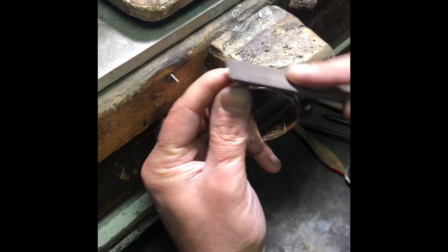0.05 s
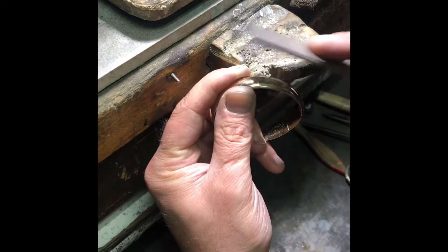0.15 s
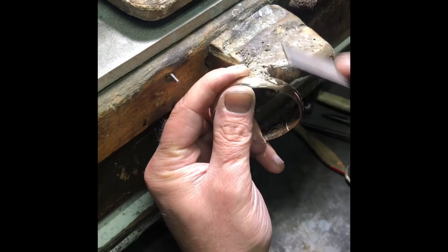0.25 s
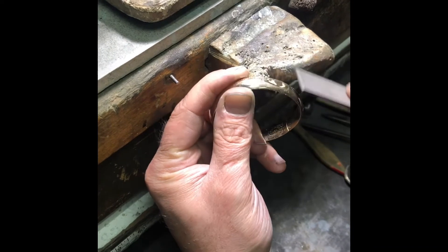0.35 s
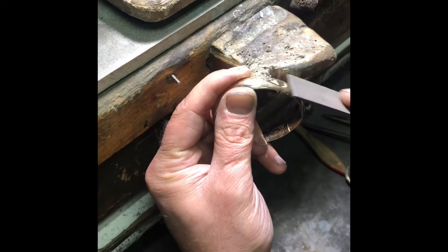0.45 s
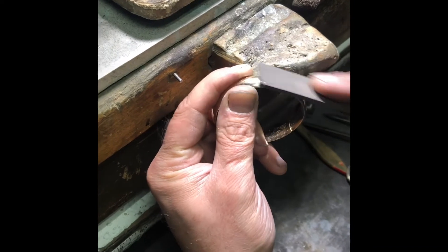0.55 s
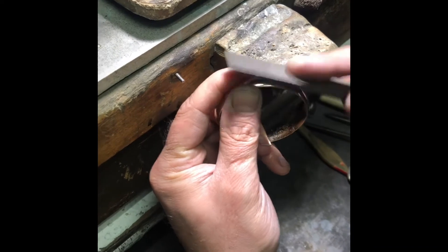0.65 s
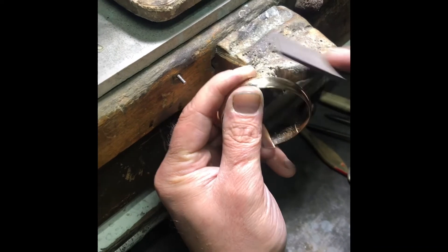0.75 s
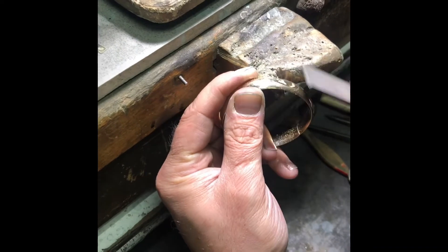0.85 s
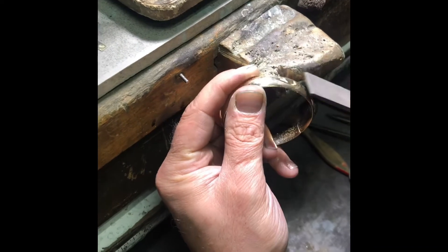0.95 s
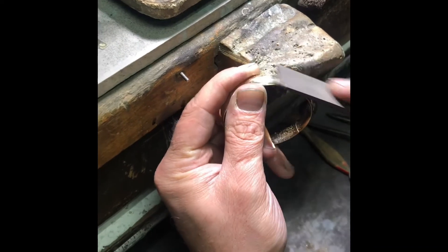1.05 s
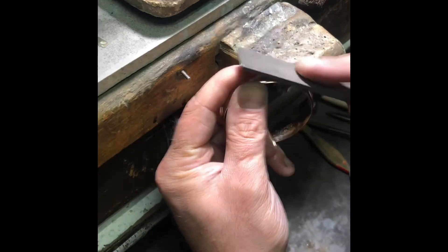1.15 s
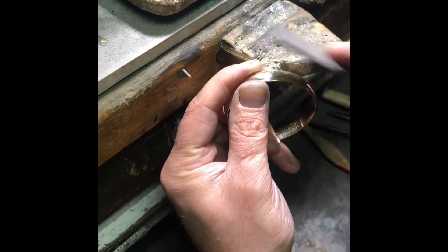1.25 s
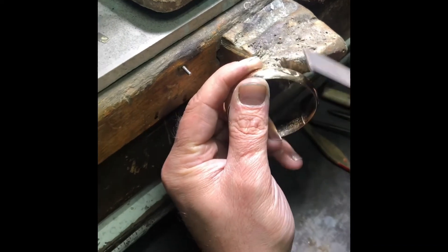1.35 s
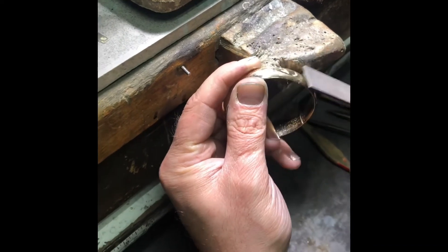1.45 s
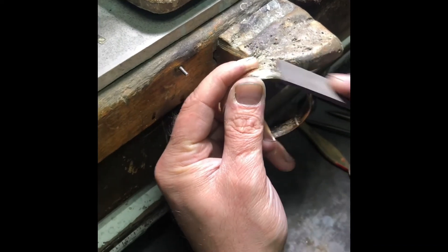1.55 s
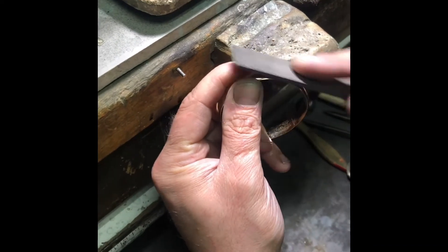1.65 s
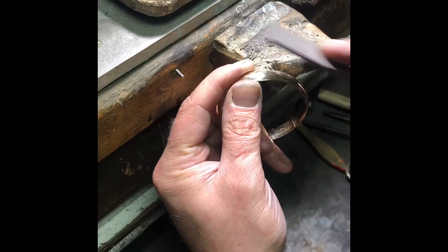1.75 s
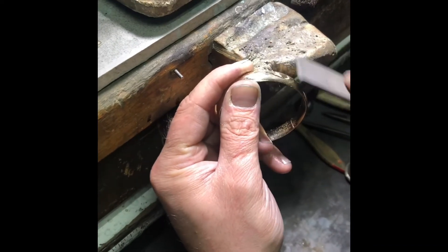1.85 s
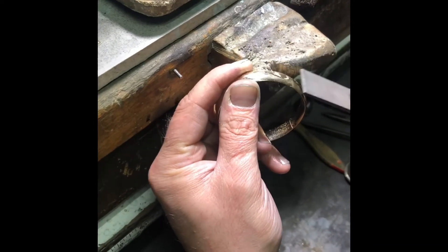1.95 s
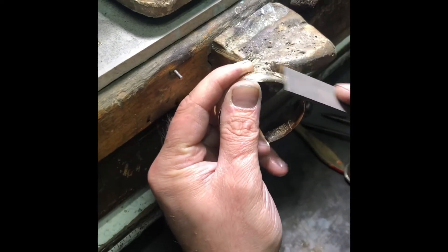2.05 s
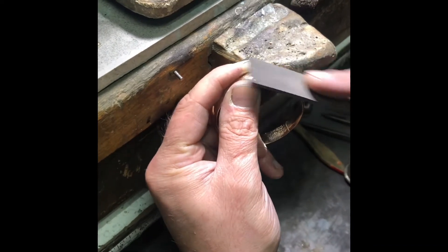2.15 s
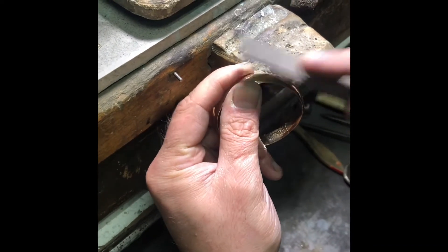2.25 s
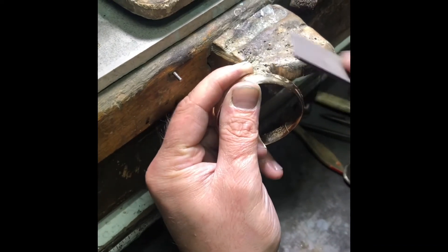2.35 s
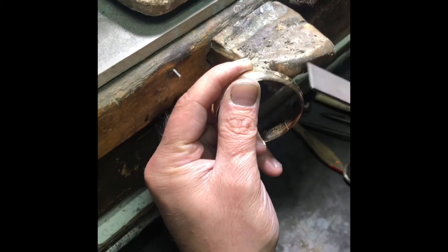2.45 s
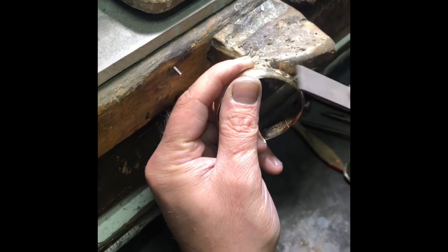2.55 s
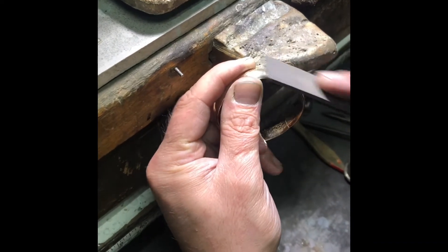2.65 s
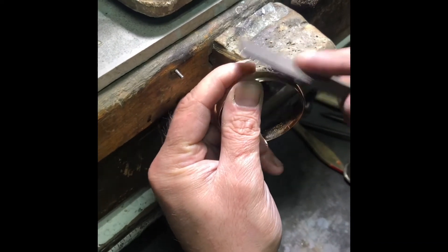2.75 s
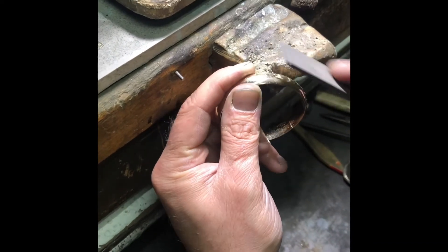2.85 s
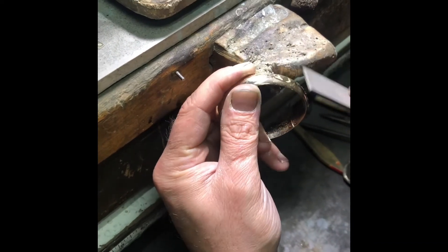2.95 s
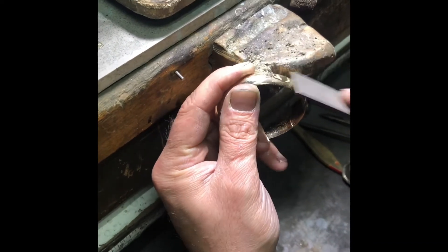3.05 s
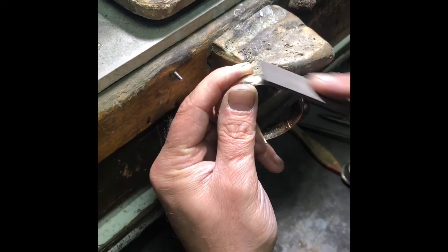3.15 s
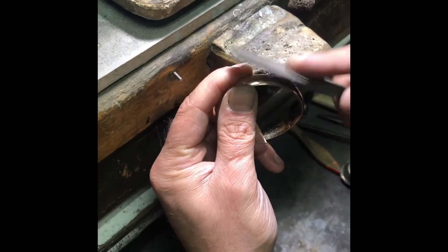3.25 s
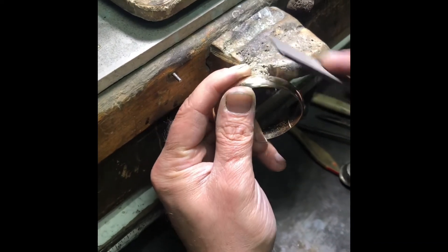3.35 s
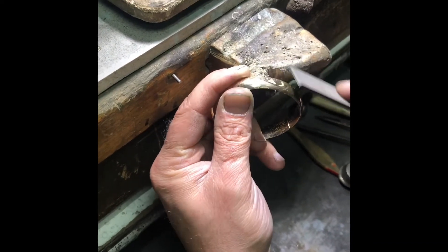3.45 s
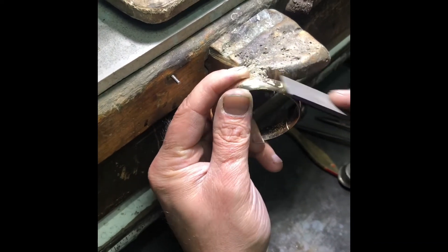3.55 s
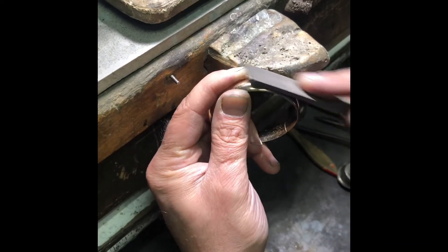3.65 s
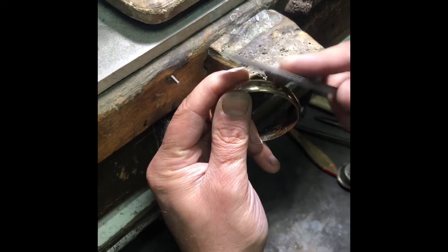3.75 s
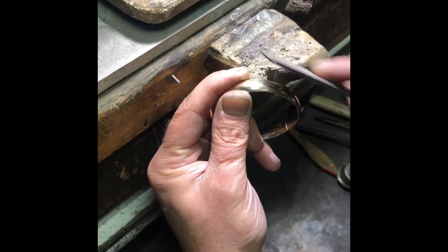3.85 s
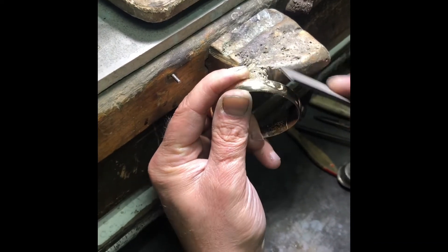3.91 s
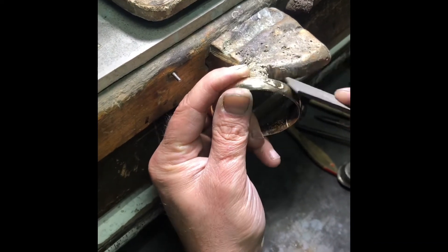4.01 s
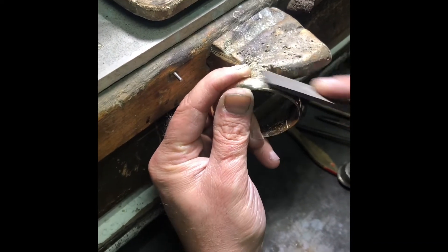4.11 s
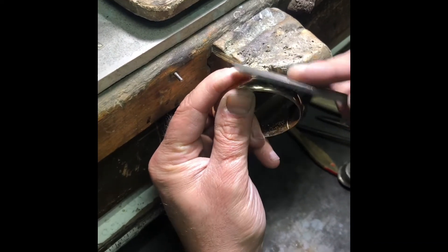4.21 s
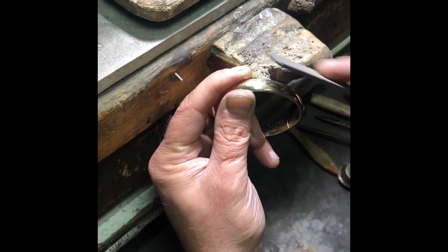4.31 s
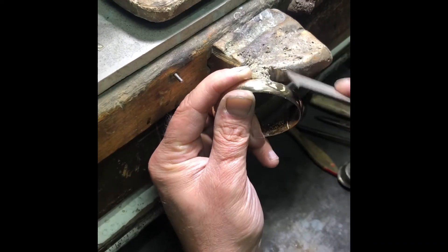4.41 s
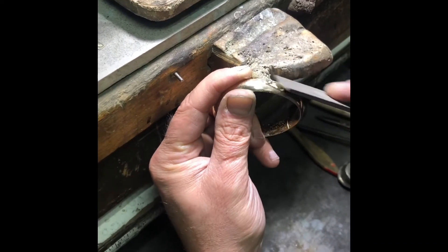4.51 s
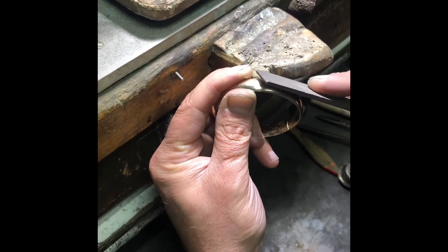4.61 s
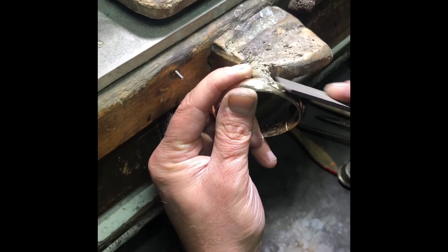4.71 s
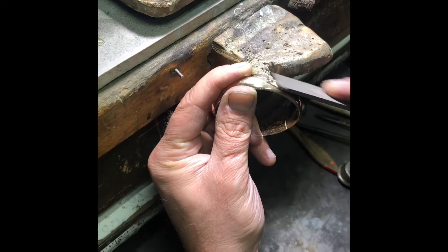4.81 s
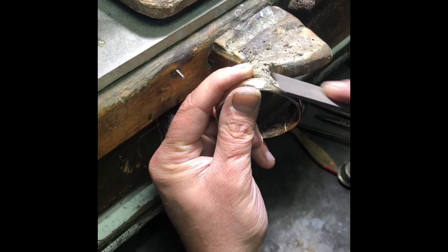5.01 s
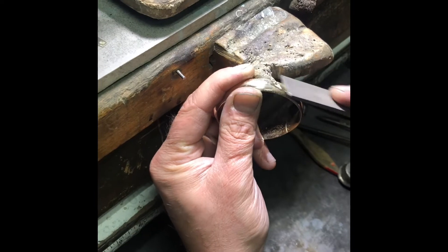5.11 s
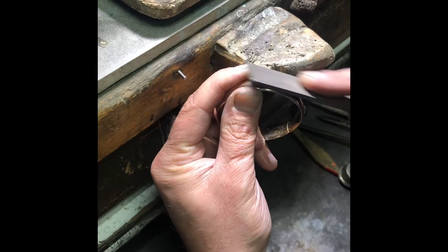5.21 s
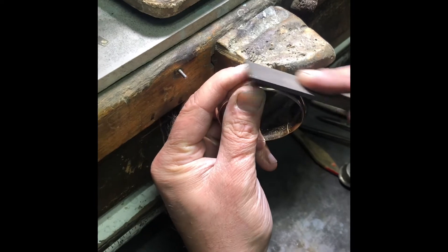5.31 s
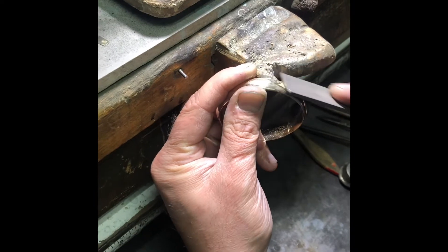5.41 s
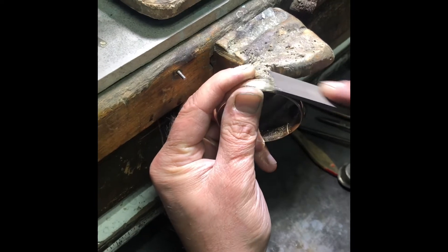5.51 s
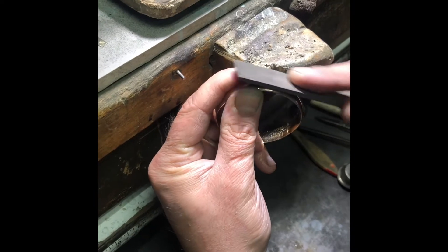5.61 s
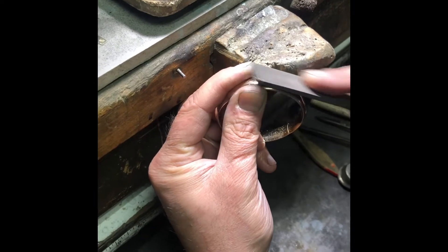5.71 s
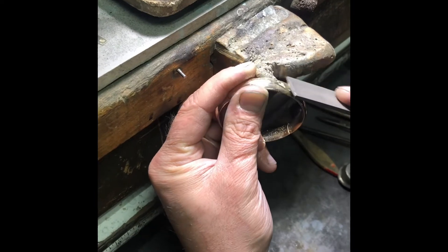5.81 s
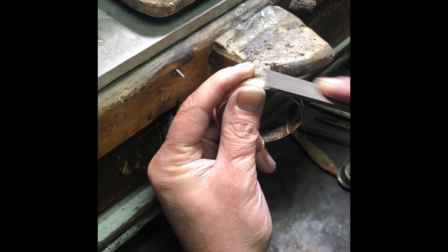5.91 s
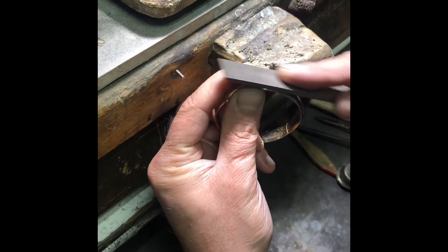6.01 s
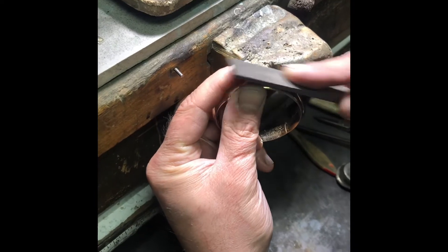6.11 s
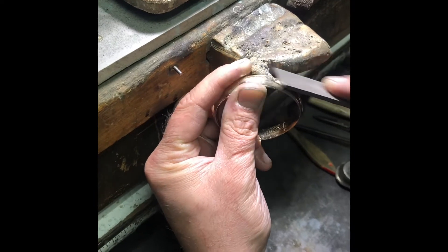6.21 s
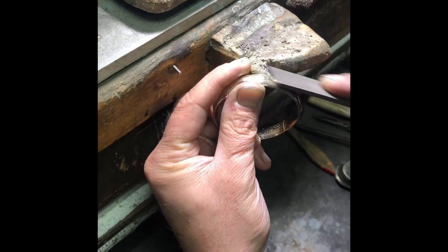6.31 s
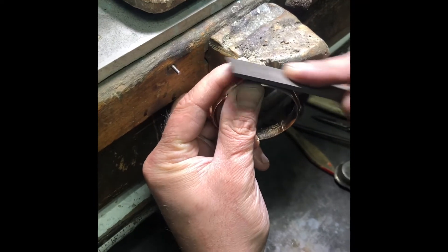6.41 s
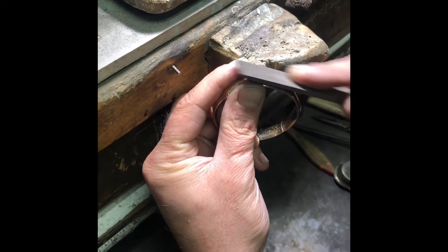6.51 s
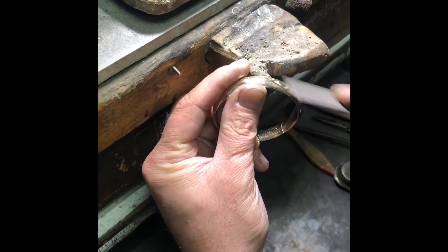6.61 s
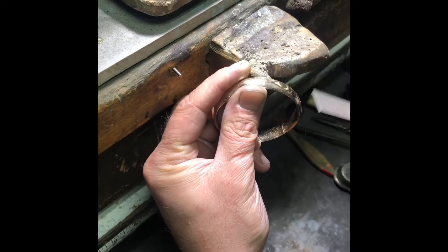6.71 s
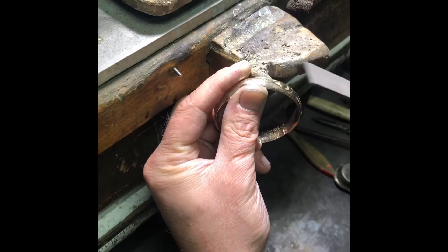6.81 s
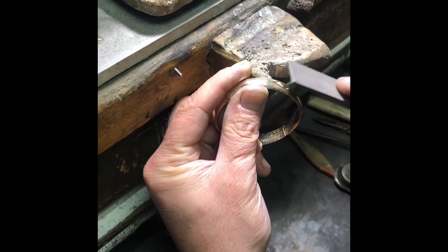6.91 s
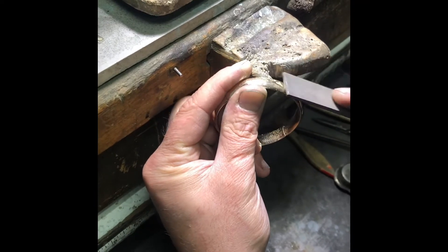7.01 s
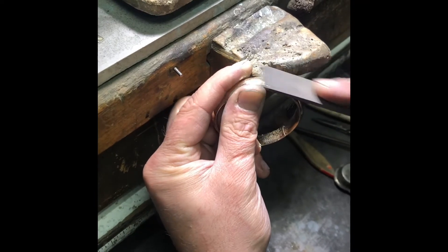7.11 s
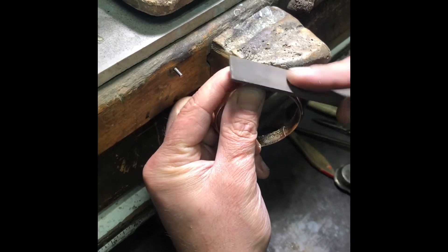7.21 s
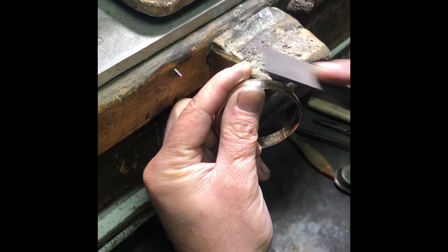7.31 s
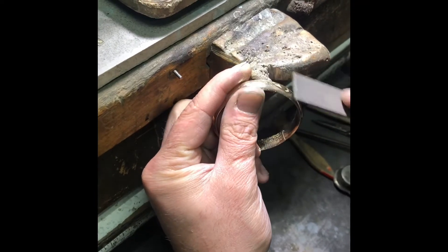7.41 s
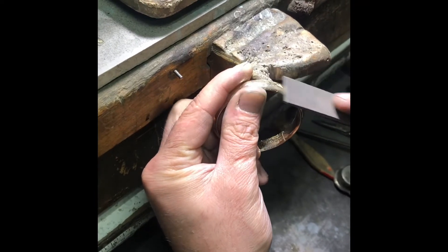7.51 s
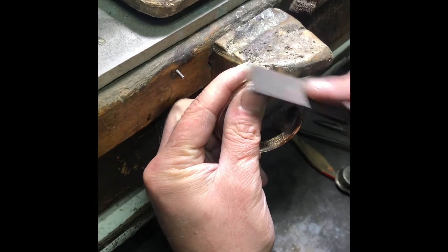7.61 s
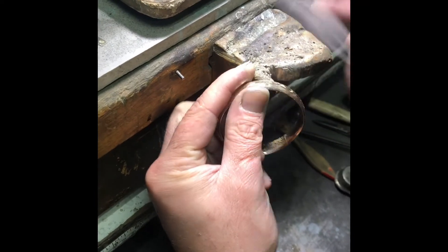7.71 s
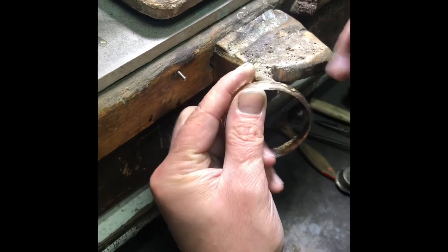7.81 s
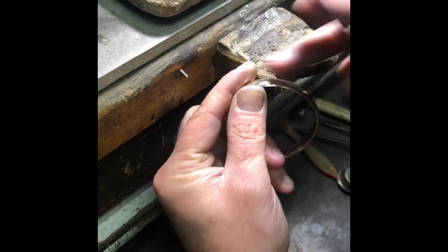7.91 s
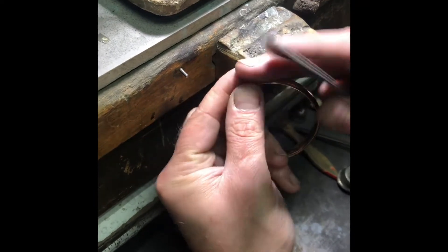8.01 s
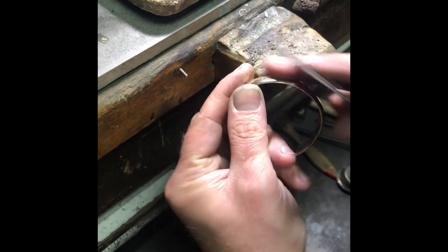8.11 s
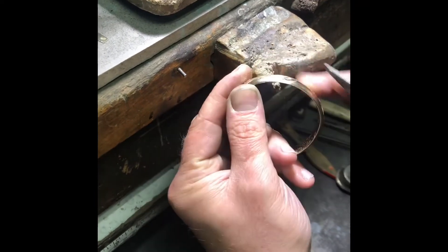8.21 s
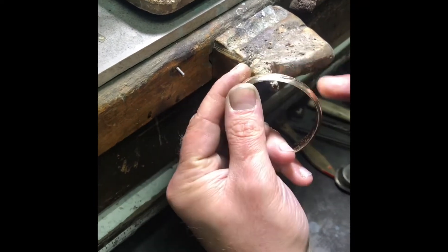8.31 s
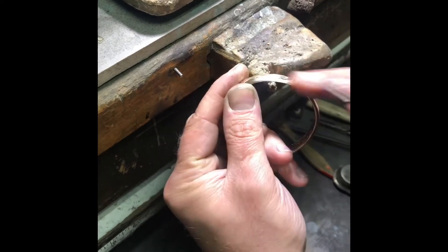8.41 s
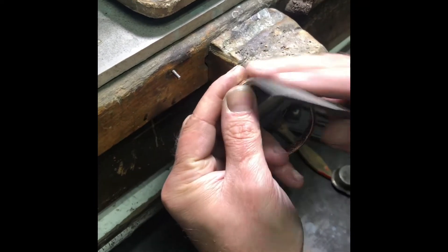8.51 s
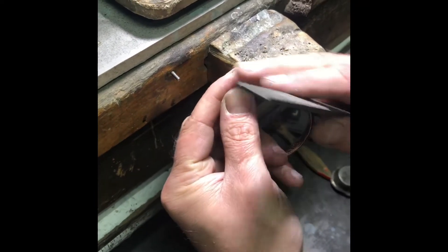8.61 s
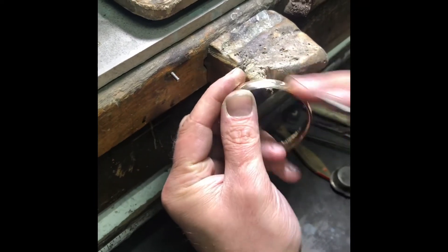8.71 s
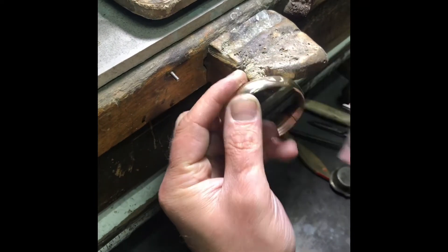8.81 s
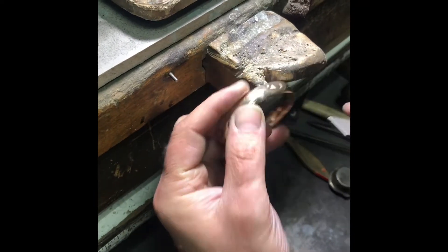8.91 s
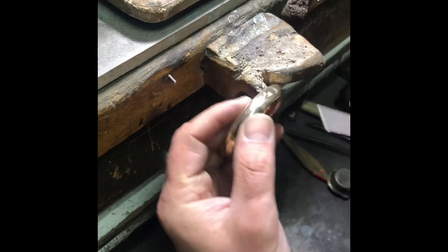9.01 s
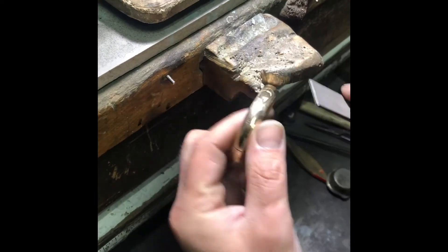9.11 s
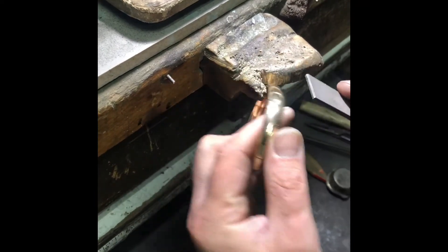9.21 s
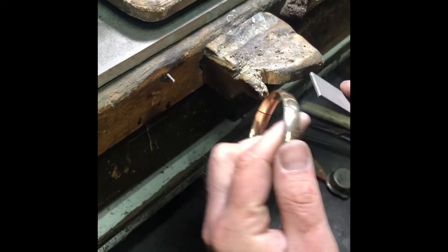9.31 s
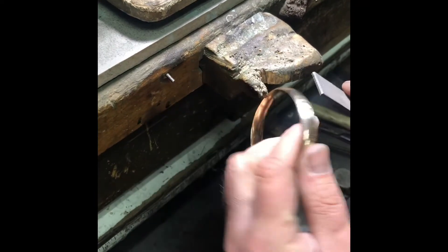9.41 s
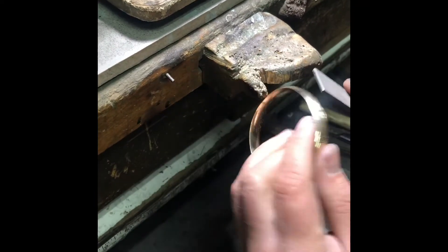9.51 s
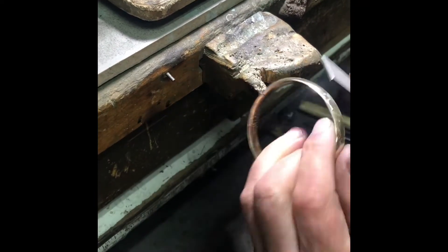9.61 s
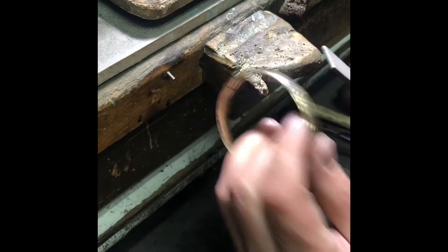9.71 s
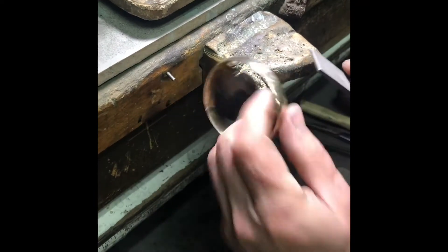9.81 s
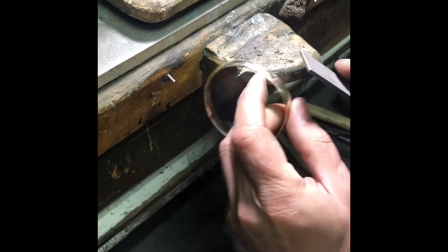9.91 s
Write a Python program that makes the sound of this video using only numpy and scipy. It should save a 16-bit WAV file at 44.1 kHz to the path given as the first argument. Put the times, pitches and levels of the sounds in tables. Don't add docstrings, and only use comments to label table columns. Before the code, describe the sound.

Close, dry filing on hollow metal: steady half-second rasps, a quicker run, a few slower strokes, then fingertip hisses and bangle knocks over faint hum.

```python
import sys
import numpy as np
from scipy import signal
from scipy.fft import rfft, irfft, next_fast_len
from scipy.io import wavfile
from scipy.ndimage import uniform_filter1d, map_coordinates

SR = 44100
rng = np.random.default_rng(int(sys.argv[2]) if len(sys.argv) > 2 else 0)


def level_to_linear(level):
    exponent = np.asarray(level, float) / 20
    return 10 ** exponent


def to_wav(sig):
    pcm = np.clip(np.atleast_2d(sig), -1, 1) * 32767
    pcm = np.round(pcm).astype(np.int16)
    wavfile.write(sys.argv[1], SR, pcm.T)


N = 438783
SIZE = next_fast_len(N + SR // 2)
HZ = np.fft.rfftfreq(SIZE, 1 / SR)

# frequency in Hz, level in dB per Hz.
AIR_SPECTRUM = [(12, -47), (20, -19), (70, -9), (113, -2.5), (269, -4), (356, -12), (398, -5.5),
                (572, -14.5), (870, -19), (1610, -21), (4780, -32), (9090, -34), (11100, -36),
                (13100, -29.5), (15900, -35)]
# frequency in Hz, width in Hz, level in dB.
HUM_BANDS = [(59.2, 3.6, -68.5), (119.9, 3.7, -64), (360.3, 4.3, -69)]
# frequency in Hz, level in dB.
BUZZ_ENVELOPE = [(8300, -14), (9000, -8), (11500, -9), (12400, 0), (13400, 2), (13900, -10), (14500, 1),
                 (15700, -1)]
# frequency in Hz, time to fall by 60 dB in seconds.
ROOM_DECAY = [(150, 0.47), (800, .32), (2500, 0.19), (6000, 0.083), (15000, 0.081)]

# frequency in Hz, width in Hz, level in dB.
PIN_MODES = [(153.9, 12.5, 4), (184.5, 49.6, -1), (246.6, 30.7, 1.5), (345, 34, -8.5)]
# frequency in Hz, width in Hz, level in dB.
BANGLE_MODES = [(460, 50.5, -1.5), (593.5, 43, -3), (667.6, 30.6, -1), (747, 16.4, 6), (977, 58, 3),
                (1050, 43, 2), (1112, 46, 1), (1255, 257, -11), (1431, 117, -4)]
# frequency in Hz, width in Hz, level in dB.
UPPER_MODES = [(1675, 78, -9.5), (1852, 43, -4), (2054, 58, 1.5), (2281, 112, -1.5), (2457, 86, 0.5),
               (2890, 230, -15.5)]
# frequency in Hz, width in Hz, level in dB.
STEEL_MODES = [(3335, 47, 5.4), (4050, 23, 6.5), (10200, 350, 3.9), (10550, 84, 2.3),
               (5900, 400, 7), (7920, 380, 5), (12700, 300, 4), (13800, 350, 8), (14800, 300, 5),
               (15500, 250, 5)]

# frequency in Hz, level in dB per Hz.
RASP_SPECTRUM = [(1760, -37), (3000, 2), (5260, -4.5), (5870, -6.5), (8900, -8), (13800, -7), (15700, -7.5)]
# frequency in Hz, level in dB per Hz.
SKIN_SPECTRUM = [(1470, -23), (2500, -38), (2810, -8), (5100, -9), (8110, -2), (9610, -5), (10500, -4),
                 (15900, 2.5)]
# frequency in Hz, level in dB per Hz.
RUSTLE_SPECTRUM = [(1500, -21), (3000, 7), (7000, -5), (9000, -18), (15900, -25)]
# frequency in Hz, level in dB per Hz.
CLATTER_SPECTRUM = [(250, -74), (600, 2.5), (2000, -4.5), (3200, -30), (8000, -36)]
# frequency in Hz, level in dB per Hz.
SNAP_SPECTRUM = [(400, -25), (1000, -1), (2500, 5), (6000, -7), (8000, -15), (15900, -24)]

# start in seconds, length in seconds, strength in dB,
# share of the stroke at top speed (0-1), level of the file's highest modes in dB.
FILE_STROKES = [(0.378, 0.19, -40, 0.32, -5), (0.89, 0.21, -39.5, 0.42, -6), (1.38, 0.19, -39, 0.5, -5),
                (1.921, 0.205, -41, 0.47, -7.5), (2.483, 0.17, -42.5, 0.43, -3),
                (2.955, 0.21, -40.5, 0.47, -4), (3.441, 0.21, -41.5, 0.44, -3),
                (3.938, 0.18, -41.5, 0.49, 1.5), (4.36, 0.16, -45, 0.51, 2),
                (4.532, 0.12, -45.5, 0.42, -3.4), (4.678, 0.14, -42.5, 0.41, -2),
                (4.84, 0.12, -43.5, 0.45, -6), (4.985, 0.18, -41, 0.56, -4.5),
                (5.201, 0.14, -41.5, 0.31, -6), (5.371, 0.19, -40.5, 0.39, -5),
                (5.567, 0.16, -41.4, 0.45, -2.5), (5.739, 0.23, -40, 0.46, -2),
                (5.974, 0.18, -41, 0.47, -1.5), (6.17, 0.2, -42.5, 0.48, 2),
                (6.377, 0.16, -39.5, 0.51, 0.5), (6.919, 0.22, -42.5, 0.52, -3),
                (7.405, 0.13, -39.5, 0.53, -5)]
LIFT_SCUFFS = [
    (0.538, 0.049, -59, 0.54, -6),
    (1.567, .035, -70, 0.3, -8),
    (3.618, 0.064, -57.5, 0.6, -16),
    (7.559, 0.041, -67, 0.4, 5),
]
# start in seconds, length in seconds, hiss in dB,
# share at top speed (0-1), bangle's body over hiss in dB.
FINGER_WIPES = [
    (7.9, 0.26, -52.5, 0.38, -6),
    (8.33, 0.19, -52.5, 0.44, -10.5),
    (8.5, 0.14, -53.5, 0.4, -10),
    (8.63, .05, -63, 0.53, -4),
]
# start in seconds, length in seconds, rustle in dB,
# share at top speed (0-1), bangle's body over rustle in dB.
GRIP_SHIFTS = [
    (3.795, 0.037, -63.5, 0.4, 11.5),
    (9.095, 0.051, -68.5, 0.35, 8),
    (9.9, 0.053, -58.5, 0.41, 8.5),
]
# start in seconds, peak in dB,
# push into the pin in dB, ring of the file in dB.
FILE_TAPS = [(0.37, -27.5, -6.5, -18), (0.89, -31, -13.5, -12), (1.371, -32, -17, -16),
             (1.921, -31.5, -4.5, -16), (2.482, -30.5, 2.5, -4.5), (2.955, -28.5, -12, -19),
             (3.439, -30, -11.5, -17), (3.937, -33, -6.5, -16), (4.36, -32, -5, -11),
             (5.212, -35, -20, -39), (6.908, -29.5, 1, -6), (7.404, -28.5, -1, -3.5)]
# start in seconds, peak in dB, pitch of the blow in Hz,
# upper modes in dB, ring of the file in dB.
BANGLE_KNOCKS = [(0, -30, 840, -33, -43), (0.533, -21.5, 1080, -28, -30), (0.807, -49, 535, -32, -21),
                 (1.045, -16, 676, -48, -28), (1.116, -34, 2350, -14, -22), (1.569, -22.5, 505, -26, -21),
                 (2.602, -14.5, 1106, -20, -58), (2.629, -23.5, 710, -26, -31),
                 (3.122, -11.5, 960, -18, -63), (3.806, -38, 1200, -42, -25), (5.231, -21, 1010, -19, -39),
                 (5.638, -20.5, 990, -1, -35), (6.65, -39, 1080, -24, -27), (8.451, -29.5, 1080, -4.5, -20),
                 (8.722, -26.5, 1410, -1.5, -5), (8.835, -43, 960, -27, -29), (8.965, -31, 850, -8.5, -11),
                 (9.26, -34.5, 1030, -1.5, -20), (9.416, -34.5, 1050, -19, -36),
                 (9.441, -43.5, 996, -3, -16), (9.455, -23, 945, 1, -13.5), (9.706, -18.5, 980, -5, -8)]
# start in seconds, frequency in Hz, level in dB,
# time to fall by 60 dB in seconds.
FILE_CHIMES = [(7.572, 7800, -63, .12), (7.572, 10200, -74, .12), (7.665, 5770, -70, 0.17),
               (7.67, 6800, -66, 0.11), (7.67, 10200, -70, 0.084), (7.79, 5650, -71, .12),
               (7.8, 10100, -70, .12)]
# start in seconds, peak in dB.
EDGE_TICKS = [(0.807, -52), (1.116, -30.5), (1.569, -49), (3.802, -49), (6.648, -58), (7.636, -60),
              (8.968, -52), (9.105, -53)]

FORCE_DB = [1, -3.5, 0.77, -7.5, -5.5]
FORCE_GROWTH = [1.14, 0.61, 1.7, 1.6, 2.1]
FORCE_LINGER_S = [0.0067, 0.017, 0.0027, 0.0026, .0005]

AIR_DB, BUZZ_HZ = -58, 119.95
BUZZ_SMEAR = 0.3
ECHO_RENEW_S = 0.25
CROSS_HZ = 11500
CRUISE = 1.15
SKIN_GROWS = 4.5
TICK_S = 0.00061
TAP_UPPER_DB, UPPER_FOLLOWS_PIN = 2.1, 0.41
TAP_STEEL_DB, STEEL_FOLLOWS_RING = -2, 0.59
KNOCK_PIN_DB, KNOCK_STEEL_DB = -25.5, -5.5
THUD_START, THUD_SAG_PER_S = 1.19, 79


def unit(x):
    return x / np.sqrt(np.mean(x ** 2) + 1e-20)


def along(points, hz):
    f, v = np.transpose(points)
    return np.interp(np.log(hz + 1), np.log(f + 1), v)


def coloured(spectrum):
    return level_to_linear(along(spectrum, HZ))


def filtered(x, response):
    power = np.mean(np.abs(response) ** 2)
    return irfft(rfft(x, SIZE) * response / np.sqrt(power), SIZE)[:N]


def modes(table):
    total = 0
    for k, (centre, width, db) in enumerate(table):
        damping = 1j * HZ * width
        total = total + (-1) ** k * level_to_linear(db) * damping / (centre * centre - HZ ** 2 + damping)
    return total


def wobble(rate):
    knots = rng.standard_normal(int(N * rate / SR) + 4)
    return map_coordinates(knots, [np.arange(N) * rate / SR])


def workshop():
    drift = level_to_linear(0.7 * wobble(3))
    air = level_to_linear(AIR_DB - 3.0) * drift * filtered(rng.standard_normal(N), coloured(AIR_SPECTRUM))
    hum = 0
    for hz, width, db in HUM_BANDS:
        hum = hum + level_to_linear(db) * filtered(rng.standard_normal(N), modes([(hz, width, 0)]))
    overtones = BUZZ_HZ * np.arange(70, 132)
    level = level_to_linear(along(BUZZ_ENVELOPE, overtones) + 2.6 * rng.standard_normal(len(overtones)))
    phase = 2 * np.pi * BUZZ_SMEAR * rng.random(len(overtones))
    lines = np.zeros(len(HZ), complex)
    lines[np.round(overtones / HZ[1]).astype(int)] = level * np.exp(1j * phase)
    return air + hum + level_to_linear(-78 + wobble(5)) * unit(irfft(lines, SIZE)[:N])


def room(x):
    out, step = np.zeros(N + SR), round(ECHO_RENEW_S * SR)
    for start in range(0, N, step):
        hz, t, z = signal.stft(rng.standard_normal(SR // 2), SR, nperseg=256)
        decay = level_to_linear(-60 * t / along(ROOM_DECAY, hz)[:, None])
        tail = signal.istft(z * decay, SR, nperseg=256)[1]
        wet = signal.fftconvolve(x[start:start + step], tail / np.linalg.norm(tail))
        out[start + 250:][:len(wet)] += wet
    return out[:N]


def chimes():
    out, t = np.zeros(N), np.arange(SR // 5) / SR
    for s, hz, db, t60 in FILE_CHIMES:
        onset = 1 - np.exp(-t / 0.0017)
        out[round(s * SR):][:len(t)] += level_to_linear(db - 60 * t / t60) * onset * np.sin(2 * np.pi * hz * t)
    return out


def ticks():
    out, t = np.zeros(N), np.arange(SR // 50) / SR
    for s, db in EDGE_TICKS:
        out[round(s * SR):][:len(t)] += level_to_linear(db) * np.exp(-t / TICK_S) * rng.standard_normal(len(t))
    return filtered(out, coloured(SNAP_SPECTRUM))


def slides(rows, grows, linger_s=0):
    out = np.zeros((2, N))
    for s, length, db, top, extra_db in rows:
        duration = length + linger_s
        on = np.arange(round(s * SR), min(round((s + duration) * SR), N))
        share = (on / SR - s).clip(0) / duration
        skew = np.log(0.5) / np.log(top)
        speed = np.abs(np.sin(np.pi * share ** skew))
        gain = (np.tanh(CRUISE * speed) / np.tanh(CRUISE)) ** grows
        out[:, on] += level_to_linear([[db], [db + extra_db]]) * gain
    return out


def teeth(per_second, spread_db, chatter_db):
    instants = rng.random(N) < per_second / SR
    bites = instants * level_to_linear(spread_db * rng.exponential(size=N)) * rng.standard_normal(N)
    grains = unit(bites) + 0.6 * rng.standard_normal(N)
    return unit(grains * level_to_linear(chatter_db * wobble(120) + wobble(30)))


def wiping():
    hiss, body = slides(FINGER_WIPES, SKIN_GROWS)
    rustle, held = slides(GRIP_SHIFTS, SKIN_GROWS)
    drag = teeth(12000, spread_db=1, chatter_db=1.2)
    skin = filtered(hiss * drag, coloured(SKIN_SPECTRUM))
    skin = skin + filtered(rustle * drag, coloured(RUSTLE_SPECTRUM))
    return skin + filtered((body + held) * drag, modes(BANGLE_MODES + UPPER_MODES))


def contacts():
    rows = []
    for s, db, pin_db, ring_db in FILE_TAPS:
        upper_db = TAP_UPPER_DB + UPPER_FOLLOWS_PIN * pin_db
        file_db = TAP_STEEL_DB + STEEL_FOLLOWS_RING * ring_db
        rows.append((s, db, 2100, 0, pin_db, upper_db, file_db, ring_db, upper_db - 20, -12))
    for s, db, hz, upper_db, ring_db in BANGLE_KNOCKS:
        pin_db = KNOCK_PIN_DB - 0.4 * upper_db
        file_db = KNOCK_STEEL_DB + (upper_db + ring_db) / 2
        rows.append((s, db, hz, -8, pin_db, upper_db, file_db, ring_db, 0, -5 + 0.45 * upper_db))
    return rows


def blows():
    force, t = np.zeros((7, N + SR)), np.arange(SR // 10) / SR
    # seconds, for bangle, pin, upper, file, sheen, thud, clatter
    rise_s = np.array([[0.0015], [0.003], [0.0004], [0.0002], [0.0002], [0.0012], [0.002]])
    fade_s = np.array([[0.003], [0.004], [0.0015], [0.0023], [0.0023], [0.0018], [0.014]])
    envelope = (1 - np.exp(-(t + 1 / SR) / rise_s)) * np.exp(-t / fade_s)
    base_db = np.array([20.9, 25.2, 16.9, 20.2, 20.0, 10.5, 14.6])
    for s, db, hz, *rel_db in contacts():
        burst = rng.standard_normal((7, len(t)))
        cycles = hz * THUD_START * (1 - np.exp(-THUD_SAG_PER_S * t)) / THUD_SAG_PER_S
        jitter = np.cumsum(burst[5]) * np.sqrt(hz) / 900
        burst[5] = np.sin(2 * np.pi * cycles + jitter)
        burst *= envelope
        burst[5, 240:] -= 0.17 * burst[5, :-240]
        gain = level_to_linear(db + np.array(rel_db) + base_db)
        burst *= gain[:, None] / np.linalg.norm(burst, axis=1)[:, None]
        force[:, round(s * SR):][:, :len(t)] += burst
    return force[:5, :N], force[5, :N] + filtered(force[6, :N], coloured(CLATTER_SPECTRUM))


def filing():
    pushes = []
    for db, grows, linger_s in zip(FORCE_DB, FORCE_GROWTH, FORCE_LINGER_S):
        pushes.append(level_to_linear(db) * slides(FILE_STROKES + LIFT_SCUFFS, grows, linger_s))
    bangle, pin, upper, file, sheen = pushes
    bite = teeth(2500, spread_db=1.8, chatter_db=1.7)
    fine = unit(teeth(9000, spread_db=-3.0, chatter_db=2.0) + 1.05 * bite)
    return np.array([bangle[0] * bite, pin[0] * bite, upper[0] * bite, file[0] * fine, sheen[1] * fine])


def steel():
    lift = [1 + (level_to_linear(db) - 1) * modes([(hz, w, 0)]) for hz, w, db in STEEL_MODES]
    return coloured(RASP_SPECTRUM) * np.prod(lift, axis=0)


def patchy(x, depth_db):
    z = signal.stft(x, nperseg=256)[2]
    field = uniform_filter1d(rng.standard_normal(z.shape), size=2, axis=0)
    field = uniform_filter1d(field, size=36, axis=1)
    return signal.istft(z * level_to_linear(depth_db * unit(field)), nperseg=256)[1][:N]


def ring(bangle, pin, upper, file, sheen):
    high = 1 / (1 + (CROSS_HZ / (HZ + 1)) ** 12)
    bar = steel()
    metal = filtered(file, bar * (1 - high)) + filtered(sheen, bar * high)
    gold = filtered(bangle, modes(BANGLE_MODES)) + filtered(upper, modes(UPPER_MODES))
    return filtered(pin, modes(PIN_MODES)) + patchy(gold, depth_db=1.5) + patchy(metal, depth_db=3.2)


def scene():
    hits, wood = blows()
    bench = ring(*(filing() + hits)) + wood + wiping() + chimes() + ticks()
    return (bench + level_to_linear(-14.0) * room(bench) + workshop())[None]


def low_pass(x):
    return signal.sosfilt(signal.butter(12, 17010, fs=SR, output="sos"), x)


def record(dry):
    edge = coloured([(15700, 0), (15900, -40), (17000, -44)])
    mix = irfft(rfft(dry, SIZE) * edge, SIZE)[:, :N]
    return low_pass(mix)


dry = scene()
out = record(dry)
to_wav(out)
```